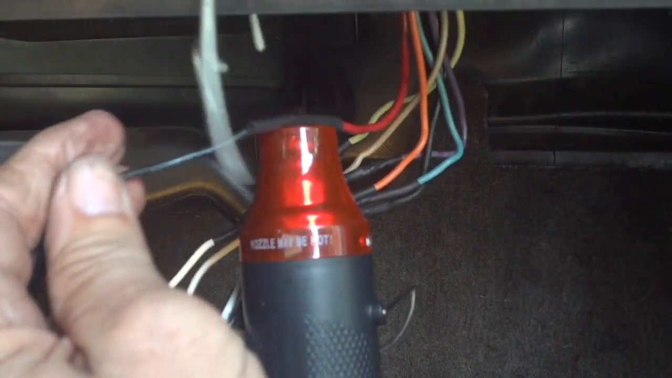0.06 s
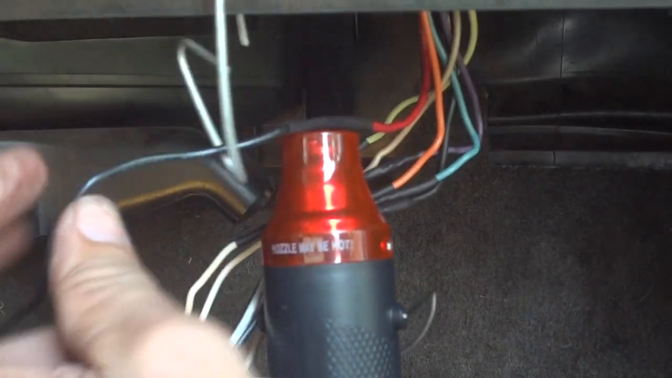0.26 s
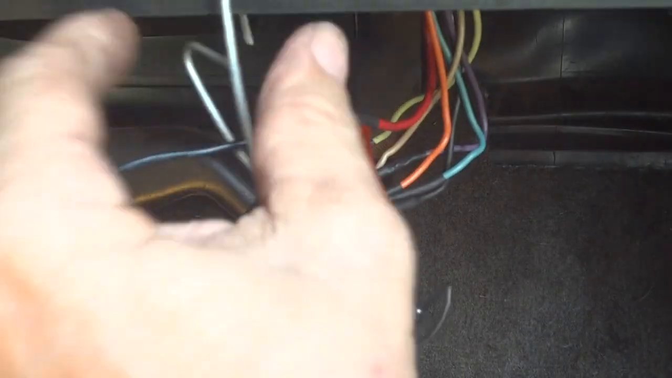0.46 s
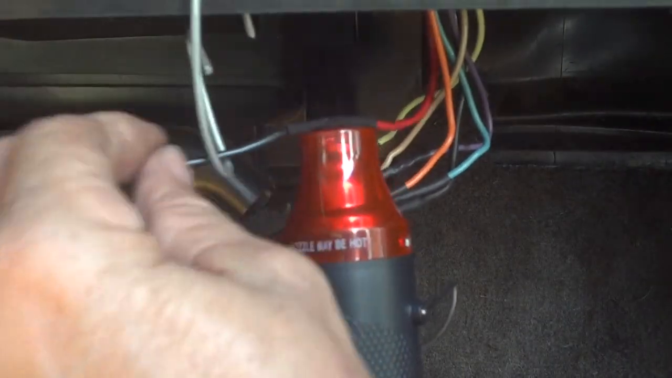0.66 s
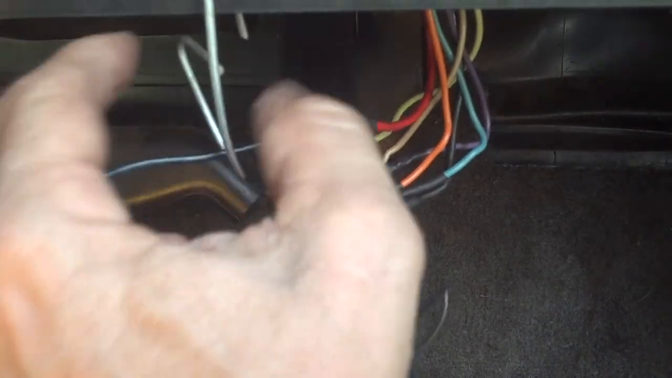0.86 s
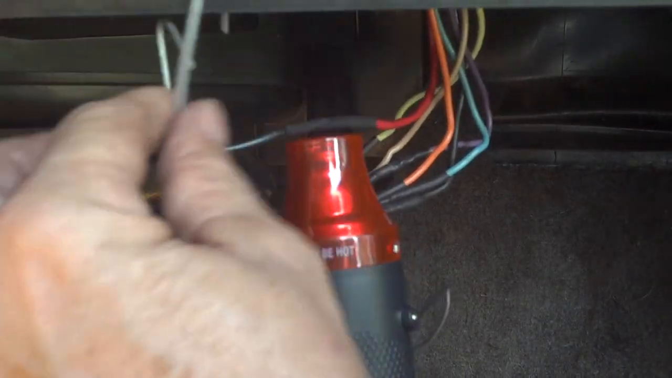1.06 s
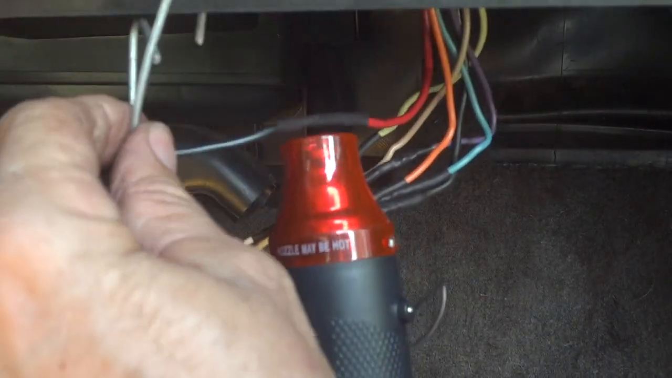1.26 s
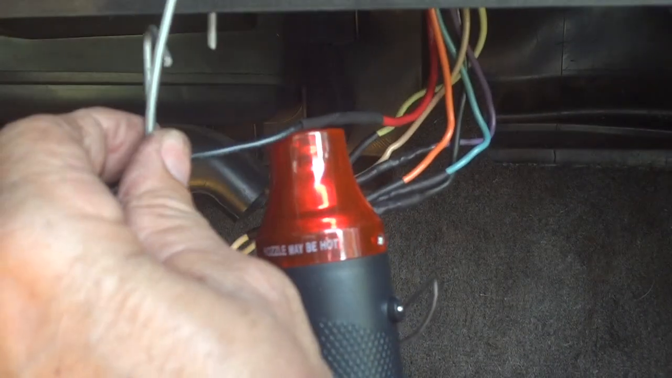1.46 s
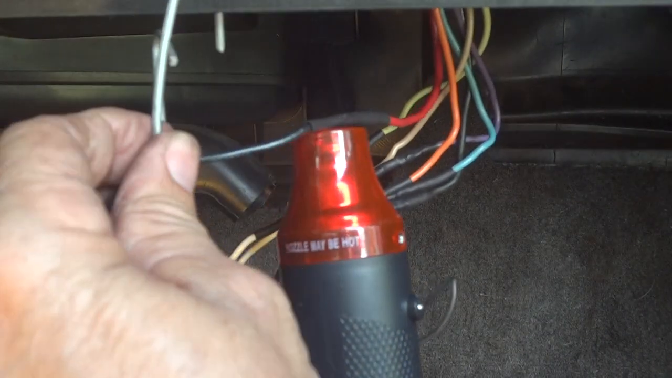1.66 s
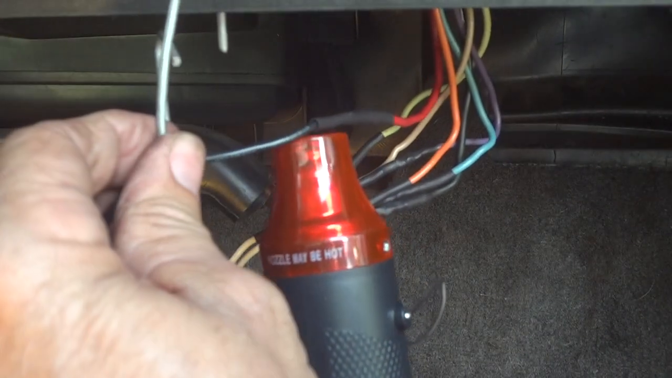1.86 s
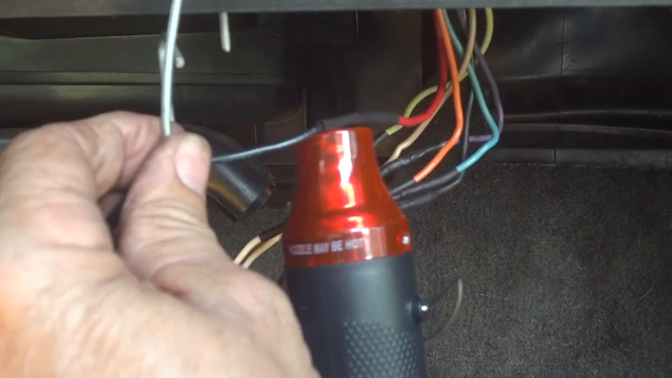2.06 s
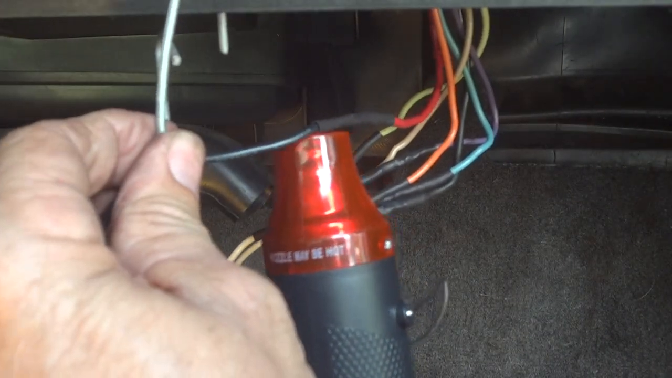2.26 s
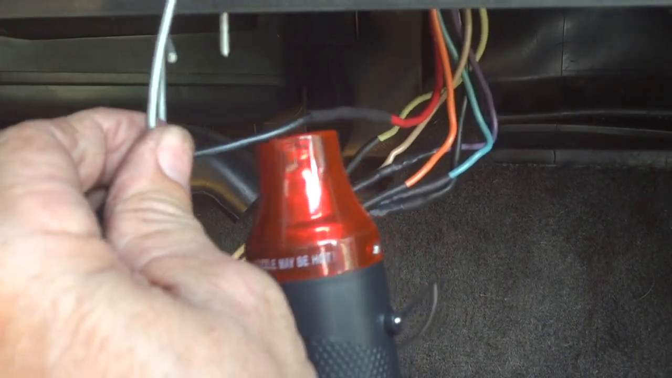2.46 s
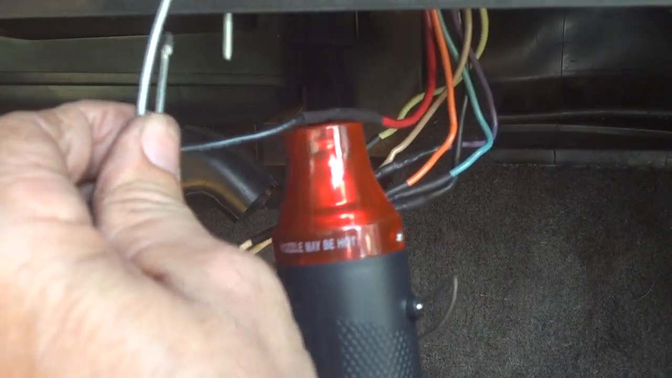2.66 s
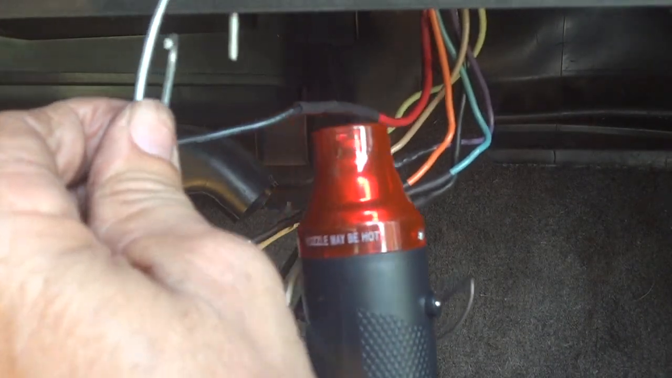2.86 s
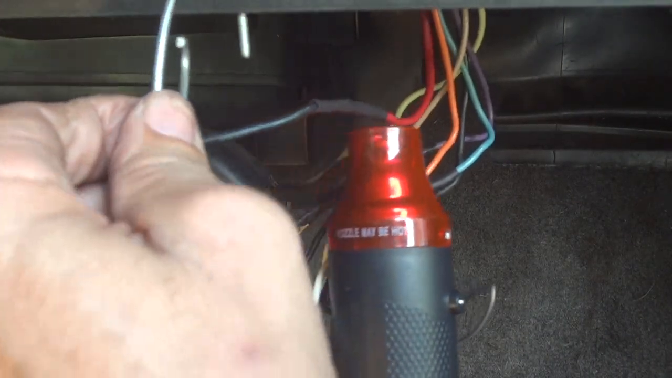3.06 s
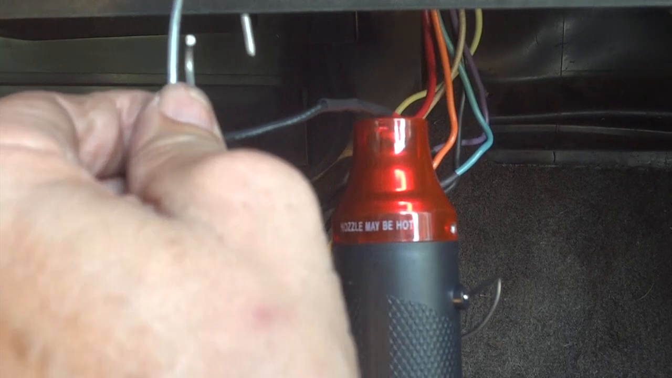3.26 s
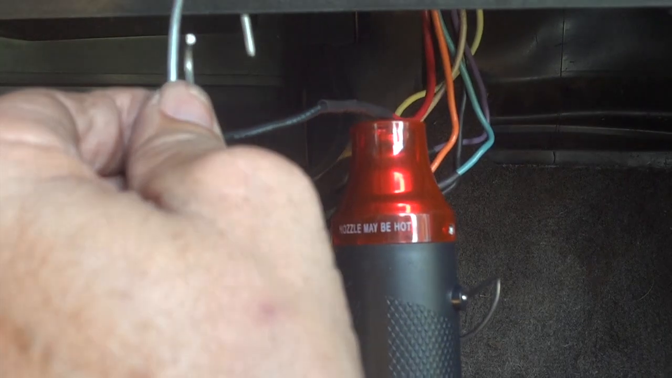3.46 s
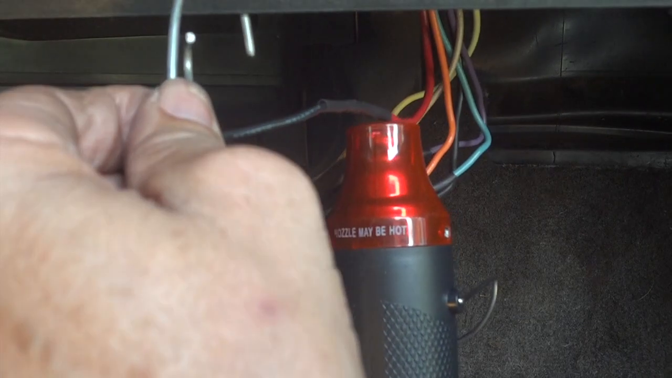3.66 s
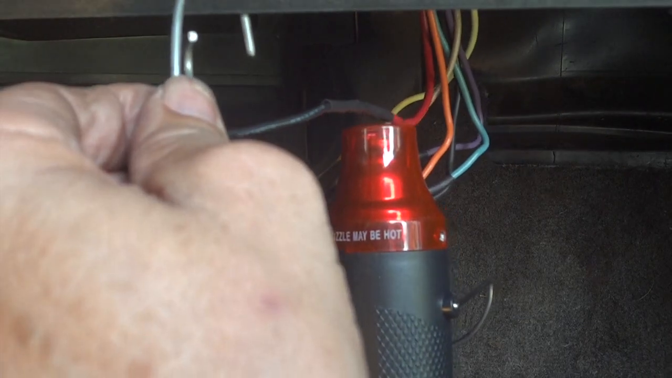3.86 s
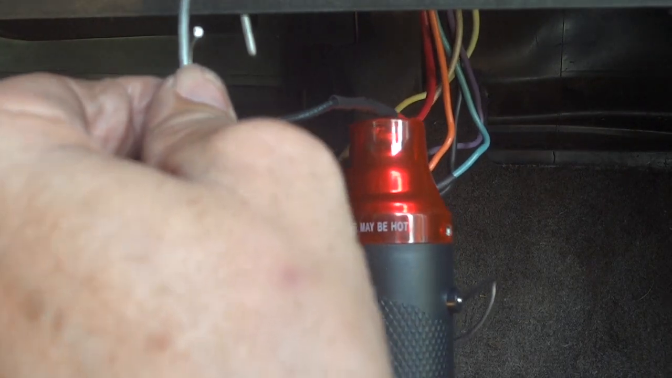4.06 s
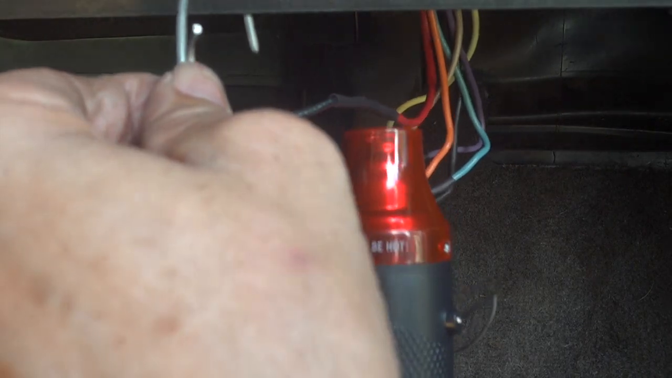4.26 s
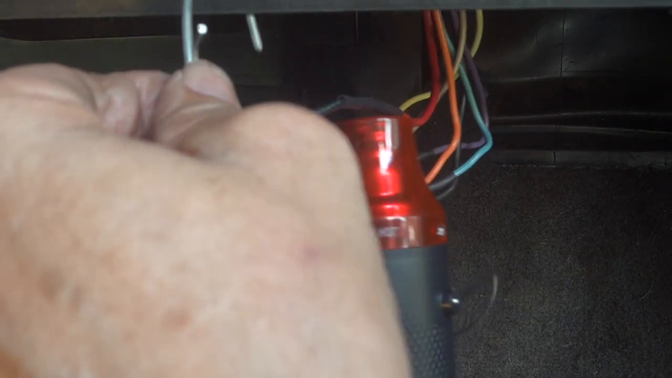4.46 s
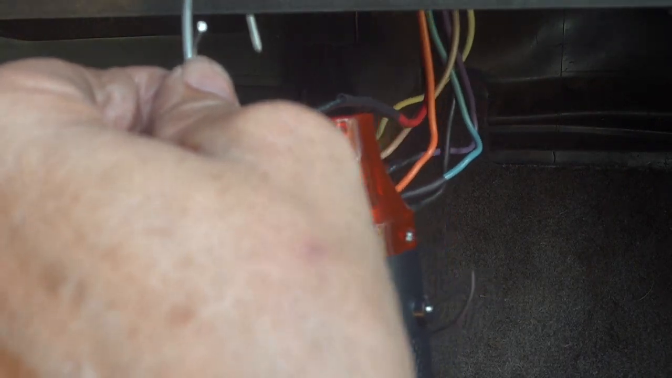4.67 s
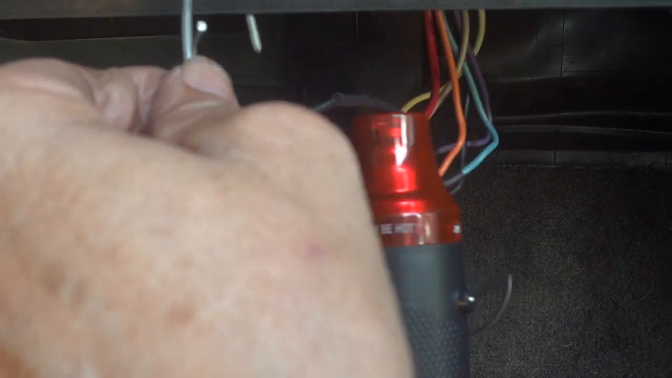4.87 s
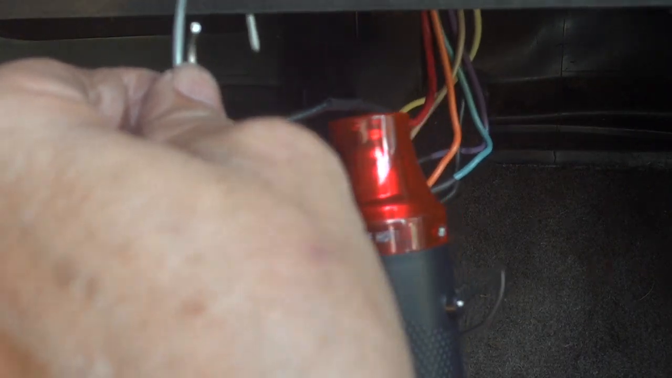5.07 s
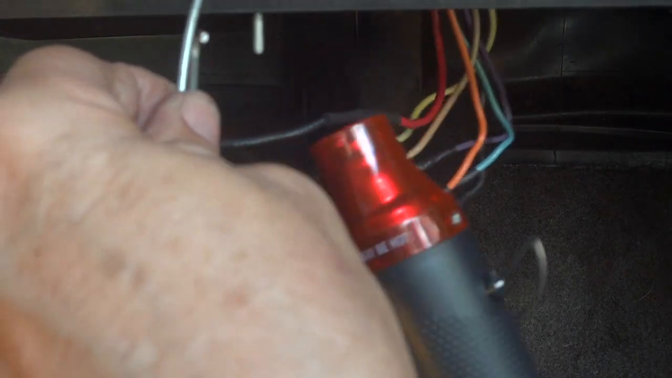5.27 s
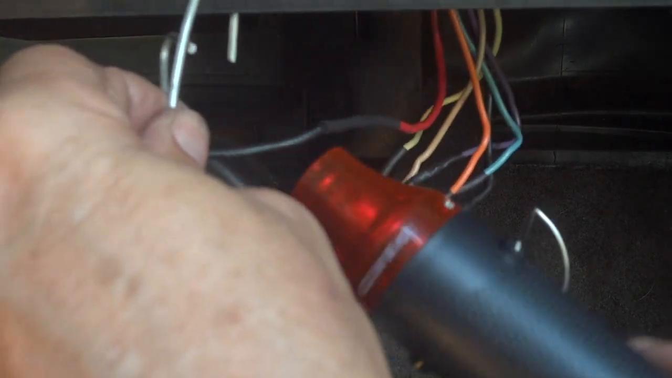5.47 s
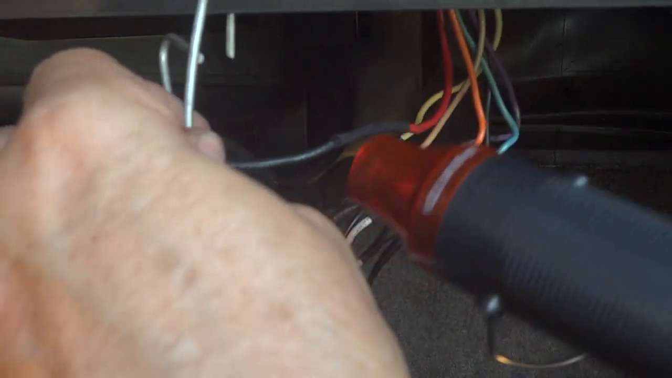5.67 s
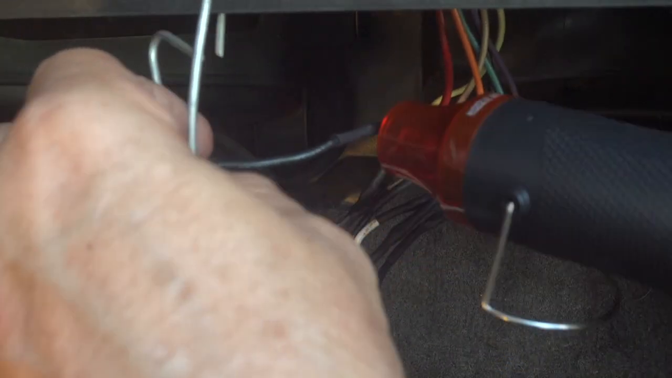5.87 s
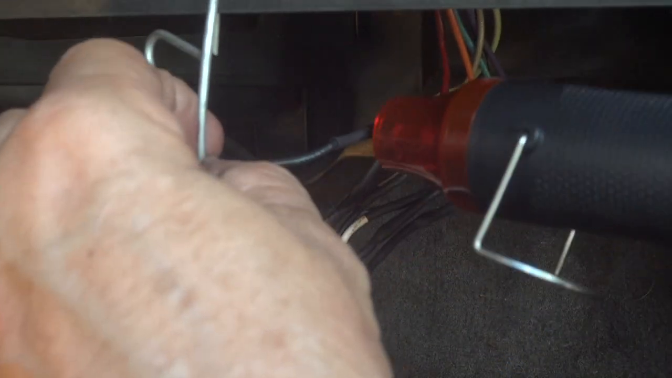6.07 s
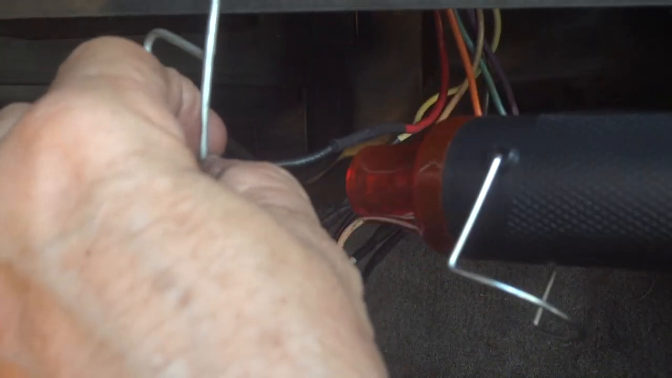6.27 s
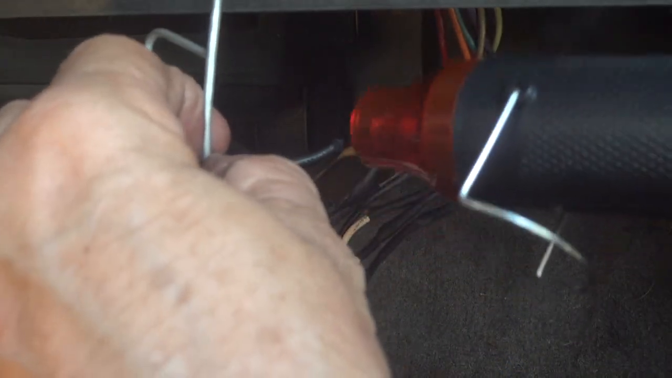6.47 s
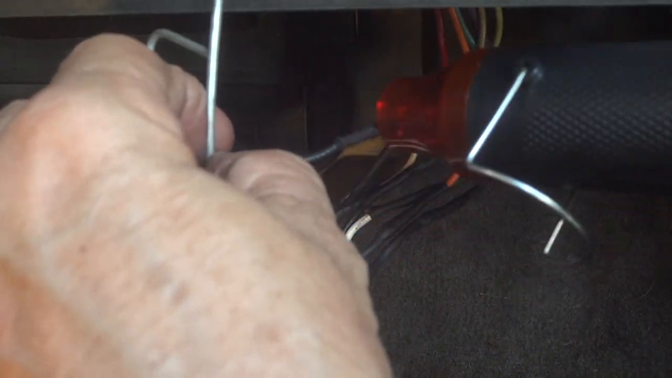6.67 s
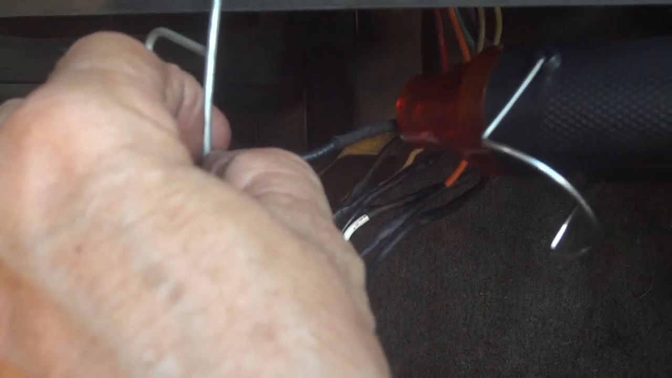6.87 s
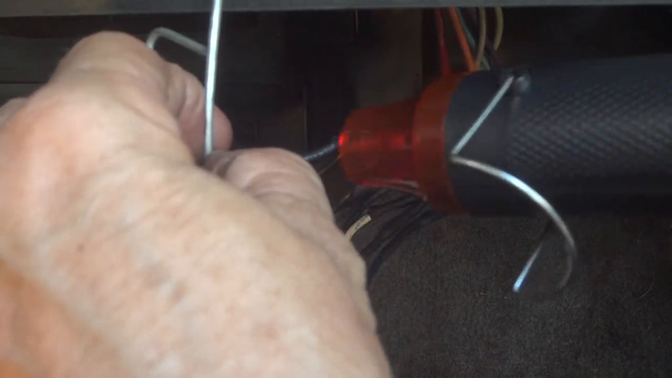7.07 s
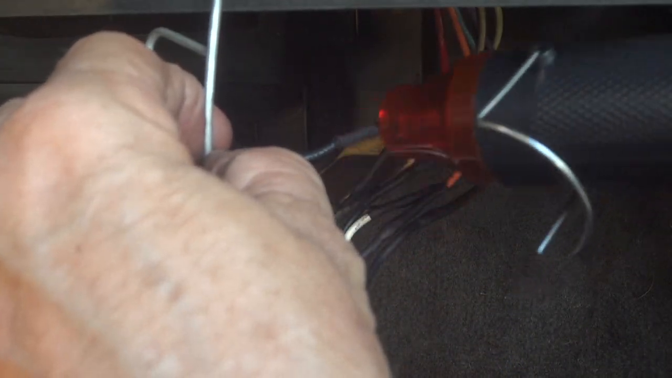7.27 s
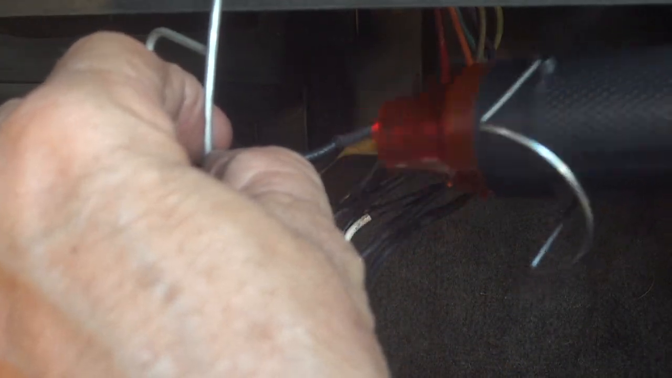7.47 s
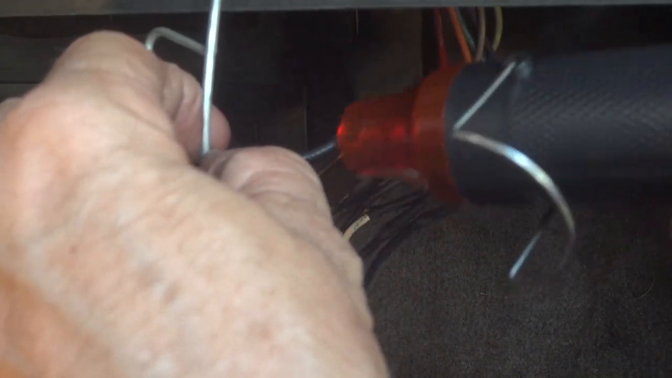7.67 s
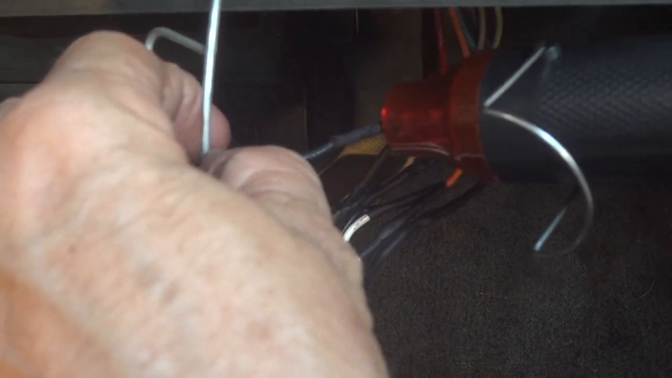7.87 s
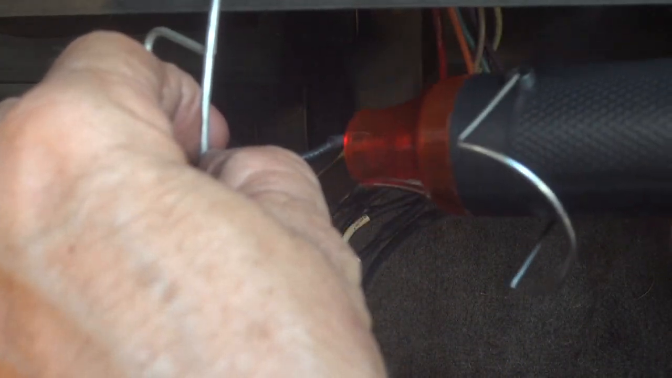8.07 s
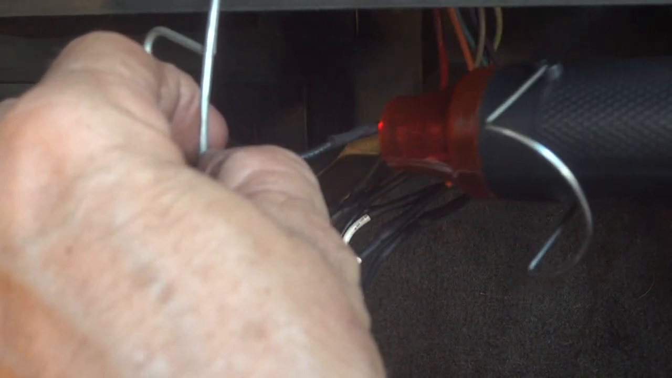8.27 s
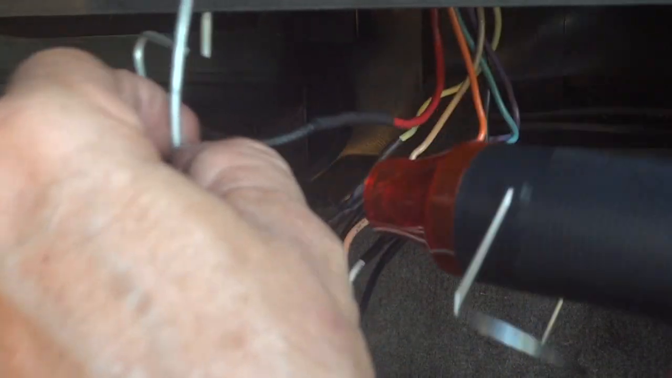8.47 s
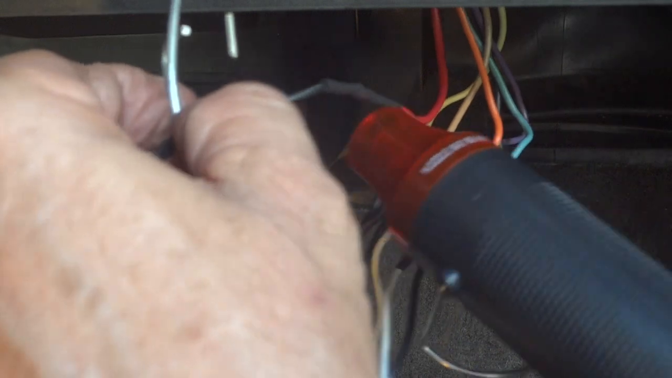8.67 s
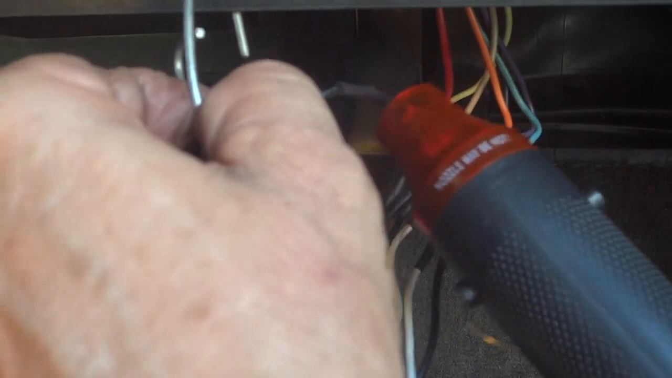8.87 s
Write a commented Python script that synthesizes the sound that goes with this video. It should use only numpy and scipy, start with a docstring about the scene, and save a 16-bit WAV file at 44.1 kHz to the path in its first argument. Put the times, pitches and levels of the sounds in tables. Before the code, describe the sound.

A small electric heat gun blows steadily close by, whining motor and airy rush, then turns sideways with howls, a piercing tone and hollow buffeting roar.

```python
"""An electric heat gun blows on wiring under a vehicle's dashboard, close to the microphone.
From the start its motor spins a five-blade fan: steady whine and rush ringing in the barrel, over a faint drone.
Whine and hum are multiples of the shaft speed; the rush is shaped noise. Past five seconds the gun is turned
on its side: the blade tone leaps, bands of noise howl and puff, and resonant noise roars in the recess.
A second faint hum swells while it lies there, and at the end the gun is turned most of the way back."""
import sys
import numpy as np
from scipy import signal
from scipy.fft import rfft, irfft
from scipy.io import wavfile
from scipy.ndimage import uniform_filter1d

SR = 44100
rng = np.random.default_rng(int(sys.argv[2]) if len(sys.argv) > 2 else 0)


def to_wav(sig):
    """Store sig (one row per channel, or 1-D mono) as 16-bit WAV at the path in sys.argv[1].

    Samples outside -1..1 are clipped; the rate is SR.
    """
    pcm = np.clip(np.atleast_2d(sig), -1, 1) * 32767
    pcm = np.round(pcm).astype(np.int16)
    wavfile.write(sys.argv[1], SR, pcm.T)  # frames by channels


N = 393372
T = np.arange(N) / SR
STFT = dict(fs=SR, nperseg=2048, noverlap=1536)
HZ, FRAME_S, _ = signal.stft(T, **STFT)

# Levels are rms unless called spectra or lifts, and stand before the trims and wavers in the functions.
# In balance_db, plus is left.

# How the gun is held: time_s, tilt (0 upright to 1 sideways)
POSE = [(0, 0.069), (5.18, 0.0058), (5.33, 0.3), (5.45, 0.5), (5.65, 0.26), (6.1, 0.99), (8.45, 0.92),
        (8.65, 0.86), (8.92, 0.25)]
CLEAR_POSE = 0.26  # tilt at which the jet leaves the wires and reaches the recess

# Motor speed: time_s, speed_turns_per_s
SHAFT_SPEED = [(0.01, 405.3), (0.41, 407.3), (0.81, 408.1), (2.81, 408.4), (3.0, 409.2), (3.4, 409.4),
               (3.9, 406.5), (4.3, 409.0), (5.61, 408.6), (6.0, 409.8), (6.3, 409.4), (6.61, 410.3),
               (7.5, 410.6), (7.91, 409.9), (8.4, 410.4), (8.9, 406.3)]
# Blade tone in standing waves, swelling and shifting as the gun moves: time_s, level_db, balance_db
BLADE_TONE = [(0.0, -40.5, 1.5), (0.45, -37, 1.5), (1.79, -40.5, 5), (2.66, -38, 1), (3.45, -45, 8),
              (4.7, -39, 4), (5.07, -40, 5), (5.29, -38, 4.5), (5.47, -27, -10), (5.56, -33.5, -10.5),
              (5.64, -37.5, 5.5), (5.79, -23, -14), (5.86, -24, -16), (6.14, -29.5, -6), (6.58, -37, -17),
              (6.93, -29, -3.5), (7.23, -38, -14), (7.53, -28, -2.0), (7.7, -41.5, -17), (7.94, -30.5, -5),
              (8.16, -37, -12), (8.3, -31.5, -6), (8.52, -34, -8.5), (8.67, -24.5, 4), (8.8, -26, 9),
              (8.92, -39, 8)]
BLADE_COUNT = 5
# Once-a-turn hum, shifting as the gun moves: time_s, level_db
ROTOR_HUM = [(0.0, -45), (0.07, -47), (0.35, -49.5), (0.5, -47), (3.95, -50), (5.37, -46.5), (5.66, -40.5),
             (5.89, -49.5), (6.48, -40), (6.95, -44.5), (7.28, -41), (7.48, -48), (7.77, -43), (7.97, -48),
             (8.17, -43), (8.37, -49), (8.5, -44.5), (8.92, -43.5)]
# Weaker motor tones: multiple_of_shaft_speed, upright_level_db, sideways_level_db
MOTOR_ORDERS = [(2, -56, -40), (3, -57.5, -57), (4, -57.5, -44.5), (6, -63, -52), (9, -66, -57),
                (10, -52.5, -49), (15, -62, -71), (17, -73, -61), (19, -66, -61), (21, -74, -71),
                (25, -75, -68), (26, -71, -78), (29, -76, -74), (30, -81, -80), (35, -75, -79),
                (36, -91, -79)]
# Thin high whistle, shifting as the gun moves: time_s, level_db
WHISTLE_LEVEL = [(0.3, -68), (.57, -48), (.8, -55), (1.3, -49.5), (1.9, -61), (2.25, -55), (2.62, -67),
                 (3.0, -38), (3.17, -50), (3.45, -48), (3.8, -56), (4.1, -45.5), (4.55, -50.5), (5.2, -54),
                 (5.95, -57), (6.3, -50), (7.2, -61), (8.0, -53), (8.5, -62)]
WHISTLE_ORDER = 20  # multiple of the shaft speed
# The whistle pipes up briefly as the gun swings: mid_s, length_s, peak_level_db
WHISTLE_CHIRPS = [(5.656, 0.067, -39), (5.84, 0.073, -49.5), (6.06, .19, -40), (6.83, 0.091, -49),
                  (8.59, .14, -38.5), (8.788, 0.066, -42.5)]

# Strength of the air stream: time_s, level_db (of the 2200-7400 Hz band)
RUSH_LEVEL = [(0.0, -32.5), (1.37, -35), (1.99, -37), (3.1, -35.5), (3.68, -37), (5.09, -34), (5.49, -34.5),
              (5.64, -32), (5.74, -34.5), (5.94, -37), (5.99, -35), (6.38, -29.5), (6.83, -30), (7.55, -32),
              (7.8, -30), (7.82, -31), (8.55, -34), (8.72, -38), (8.92, -34)]
# Rush spectrum, gun upright: frequency_hz, spectrum_db
RUSH_UPRIGHT = [(100, -18), (280, -6), (400, -9.5), (520, 0), (700, -5.5), (950, -0.5), (1120, -4.5),
                (1750, -6.5), (2150, -0.5), (4050, -1), (4250, -10), (8300, -13.5), (9800, -22),
                (16000, -58)]
# Rush spectrum, gun sideways: frequency_hz, spectrum_db
RUSH_SIDEWAYS = [(100, -30), (280, -6), (400, -16.5), (600, 5), (950, 5.5), (1200, -1), (2200, -3),
                 (3000, -5), (4700, -4.5), (6500, -5.5), (7300, -13.5), (8800, -16), (11000, -31.5),
                 (16000, -38)]
# Resonances and dips of barrel and space, gun upright: frequency_hz, width_hz, lift_db
RINGS_UPRIGHT = [(552, 42, -8.5), (585, 40, 3.5), (1140, 56, -8), (1346, 101, 19), (1488, 115, -20),
                 (1550, 35, 3.5), (2096, 140, 3), (2365, 260, -5), (2731, 150, 10.5), (3720, 70, 5),
                 (3794, 70, -8), (4070, 70, 6), (4140, 79, -33), (4630, 120, 4.5), (5380, 410, 6),
                 (6570, 200, 2.5), (7980, 180, 4.5)]
# Resonances and dips of barrel and space, gun sideways: frequency_hz, width_hz, lift_db
RINGS_SIDEWAYS = [(1400, 118, 9), (1575, 86, -9), (1693, 213, 9), (2520, 130, -20), (2680, 310, 11.5),
                  (2980, 120, -15), (3085, 77, 4.5), (3706, 55, 9), (4077, 236, 11.5), (4740, 130, 6.5),
                  (7300, 190, -15)]
# The upper upright resonances slide down as the gun tilts
BEND_ABOVE_HZ, BEND = 2000, 0.43
# Hollow note in the rush: time_s, lift_db
HOOT_LIFT = [(0.3, -3.5), (.45, 2), (.9, -0.5), (1.8, -1.5), (4.7, 0), (5.1, -1.5), (5.4, 0.5), (6.1, 2.5)]
# Balance of the air, gun upright: frequency_hz, balance_db
PAN_UPRIGHT = [(300, 0), (520, -1.5), (670, -5.5), (850, 7.5), (1050, -1.5), (1300, -4.5), (1900, 1.5),
               (2600, 1), (5000, -0.5)]
# Balance of the air, gun sideways: frequency_hz, balance_db
PAN_SIDEWAYS = [(300, 0.5), (650, 1.5), (1100, -5), (1500, -7), (1950, -5.5), (2300, -1.5), (4700, 0),
                (8500, -4), (15000, -1)]
# Phase by which the air reaches the left side first: frequency_hz, lead_rad
LEFT_LEAD = [(250, 0.15), (580, 0.17), (800, -0.1), (1150, 0.14), (1850, 0.64), (2500, 0.21), (4200, 0.05)]
# Part of the air that differs between the sides: frequency_hz, upright_db, sideways_db
DIFFUSE_AIR = [(150, -10.5, -24), (450, -9, -4), (680, -5, -30), (1250, -31, -23), (1650, -7, -13),
               (3000, -20, -12), (5300, -25, -25), (6330, -8.5, -21), (10400, -14, -1), (14500, -39, -14)]
# Fine hiss of the jet on the wires: frequency_hz, upright_spectrum_db, sideways_spectrum_db
FIZZ_SPECTRUM = [(3000, -33, -33), (8000, -7, 4), (10300, 9.5, 2.5), (12550, 8, -4), (12900, 1, -2),
                 (13800, -2, -6), (14900, 0, 0), (16000, -10, -3)]
# Strength of that hiss: time_s, level_db (of the 10200-16000 Hz band)
FIZZ_LEVEL = [(0, -58.5), (1.2, -65), (3.2, -65), (4.3, -68.5), (5.4, -61), (5.95, -67), (6.2, -53.5),
              (6.7, -50), (6.95, -56), (7.5, -65), (8.4, -70), (8.92, -72)]
TILT_PATCHY_DB = 3.5  # added patchiness of the hiss at full tilt

# Low drone: time_s, pitch_hz, level_db
DRONE = [(0, 61.2, -52), (1.4, 61, -51.5), (1.9, 60.6, -62.5), (4.6, 59.8, -60.5), (5.15, 56.1, -55),
         (5.6, 54.7, -57), (5.93, 54.96, -74), (6.37, 55.4, -55), (6.6, 55.1, -73), (6.95, 55.3, -56),
         (7.55, 54, -65), (7.75, 54.7, -59), (8.35, 55.7, -68), (8.55, 56, -61), (8.9, 56.5, -67)]
# Partials of the drone: multiple_of_pitch, relative_db
DRONE_PARTIALS = [(1, -14.5), (2, -1), (3, -11)]
# Bed of rumble: frequency_hz, spectrum_db
RUMBLE_SPECTRUM = [(10, -60), (34, -36), (41, -18), (45, -9), (53, -17), (77, -16), (90, -3), (100, -4),
                   (112, -1), (136, -2.5), (152, -25), (270, -4), (400, -20), (2000, -68)]

# Bands of noise that swell and fade: gliding howls, long soft swells, a thin squeal, treble puffs:
# mid_s, length_s, start_pitch_hz, end_pitch_hz, width_hz, level_db, balance_db
NOISE_BANDS = [(2.578, 0.21, 5200, 5130, 260, -48, 1), (4.75, 1.5, 870, 885, 170, -52, -1),
               (5.05, .9, 2700, 2700, 200, -41.5, 2), (4.9, 0.57, 14250, 14200, 49.5, -58, 0),
               (5.49, .18, 1920, 1720, 210, -42, -10), (5.3, 0.48, 3780, 3420, 200, -42, 3),
               (5.374, 0.18, 7400, 5900, 450, -51, 0), (5.5, 0.3, 5400, 5170, 300, -49, 3),
               (5.55, 0.61, 3520, 3120, 240, -42, -6), (5.556, 0.38, 1980, 1520, 249, -30.5, -10),
               (5.557, 0.09, 1760, 1690, 200, -29, -11), (5.58, 0.065, 3950, 3950, 260, -35, -3),
               (5.583, 0.045, 3100, 3130, 170, -31.5, -5), (5.59, 0.051, 2680, 2670, 170, -30, -5),
               (5.634, 0.042, 1720, 1640, 230, -27, -9), (5.639, 0.12, 5010, 4780, 190, -33, -3.5),
               (6.013, 0.14, 4540, 4350, 210, -33.5, -3), (6.09, .1, 1750, 1780, 250, -37, -10),
               (6.1, .1, 7300, 7350, 170, -42, -13), (6.202, 0.47, 4300, 4820, 350, -37, -3),
               (6.33, 0.093, 2680, 2700, 250, -32, 2), (6.393, 0.065, 5630, 5800, 260, -29.5, -4),
               (6.58, 0.22, 3700, 3700, 170, -35.5, -2), (6.566, 0.47, 5700, 6240, 480, -37, -5),
               (6.695, .2, 2720, 2730, 300, -40, -2), (6.803, 0.28, 4760, 4600, 330, -32, -2),
               (6.94, 0.38, 4620, 4850, 330, -32.5, -.5), (7.23, 0.28, 2660, 2720, 260, -36.5, 1),
               (7.65, .12, 14800, 14800, 450, -54, -1), (7.8, .1, 11900, 11900, 900, -51, -5),
               (7.81, .1, 14900, 14900, 550, -52, -3), (8.19, .2, 14900, 14900, 450, -53, -1),
               (8.51, 0.078, 11500, 12400, 1100, -50, -6), (8.57, 0.066, 5240, 5120, 150, -35, 0),
               (8.61, 0.13, 7560, 7950, 400, -41, 0), (8.638, 0.34, 4260, 3450, 600, -41, 0),
               (8.82, 0.55, 4830, 5270, 330, -44.5, -2), (8.86, 0.31, 1360, 1560, 300, -41.5, -4),
               (8.879, 0.39, 2090, 3120, 400, -34, 2.5), (8.892, 0.083, 2940, 3120, 260, -31, 2.5)]
# Jet striking the recess: time_s, level_db (of the 480-785 Hz band)
ROAR_LEVEL = [(5.4, -58), (5.5, -49), (5.66, -32), (5.76, -43), (5.98, -42), (6.06, -34), (6.3, -29),
              (7.1, -28.5), (7.24, -28), (7.36, -32.5), (7.45, -34), (8.3, -33.5), (8.85, -40)]
# Hard gusts in the recess, and a lull where negative: mid_s, length_s, lift_db
BUFFETS = [(6.115, 0.045, 8), (6.15, 0.036, 0), (6.235, 0.079, 6), (6.37, 0.035, 6), (6.55, 0.085, 3.5),
           (6.748, 0.044, 10.5), (6.835, 0.089, 5), (7.065, 0.081, 4), (7.115, 0.05, 7), (7.255, .04, -10),
           (7.31, 0.1, 5), (7.375, 0.049, 10)]
# Sound of the recess: frequency_hz, spectrum_db
RECESS_SPECTRUM = [(60, -39), (400, -37), (490, -17), (580, 1.5), (650, 3), (760, -1), (900, -5.5),
                   (1150, -57), (3000, -47)]

EDGE_HZ = 15800  # upper band limit at the microphone


def amp(db):
    """Amplitude of a level in dB."""
    return 10 ** (np.asarray(db) / 20)


def evened(x):
    """A signal scaled to rms one."""
    return x / np.sqrt(np.mean(x ** 2) + 1e-20)


def follow(rows, at):
    """The columns of a table, joined by straight lines and read at the given places."""
    place, *columns = np.transpose(rows)
    return [np.interp(at, place, c) for c in columns]


def bell(centre_hz, width_hz):
    """Gain of a steep resonance, one at its centre."""
    return 1 / (1 + 2 * ((HZ[:, None] - centre_hz) / width_hz) ** 2)


def read(points, rings=()):
    """A table over log frequency as a column, lifted or dipped in dB at its resonances."""
    f, values = np.transpose(points)
    lift = 0
    for hz, width, peak_db in rings:
        lift = lift + 10 * np.log10(1 + (amp(peak_db) ** 2 - 1) * bell(hz, width) ** 2)
    return np.interp(np.log(HZ + 1), np.log(f), values)[:, None] + lift


def bent(colour, pose):
    """A spectrum whose upper part sinks in pitch as the gun tilts."""
    hz = HZ[:, None]
    reach_hz = np.maximum(hz - BEND_ABOVE_HZ, 0) * bell(BEND_ABOVE_HZ, 4000)
    return np.interp(hz + BEND * pose * reach_hz, HZ, colour[:, 0])


def sides(pan_db):
    """Left and right gains whose mean is one."""
    pair = np.array([amp(pan_db / 2), amp(-pan_db / 2)])
    return pair / pair.mean(0)


def drift(rate_hz):
    """Random wander of unit size, up to about the given rate."""
    f = np.fft.rfftfreq(N, 1 / SR)
    return evened(irfft(rfft(rng.standard_normal(N)) / (1 + (f / rate_hz) ** 4), N))


def frame_drift(rate_hz):
    """The same kind of wander, one value per frame."""
    return np.interp(FRAME_S, T, drift(rate_hz))


def lifts(rows, at):
    """Short smooth rises or dips, one for each row of mid_s, length_s, height."""
    return sum(height * np.cos(np.pi * np.clip((at - s) / length, -.5, .5)) for s, length, height in rows)


def patches(width_order, length_order):
    """A random field of unit size, smooth over so many frequency bins and frames."""
    field = rng.standard_normal((len(HZ), len(FRAME_S)))
    for _ in range(2):
        field = uniform_filter1d(field, size=width_order, axis=0)
        field = uniform_filter1d(field, size=length_order, axis=1)
    return evened(field)


def unit_band(gain, lo_hz, hi_hz):
    """Scales a spectrum so that its noise has rms one inside a band."""
    inside = np.clip(np.minimum(HZ - lo_hz, hi_hz - HZ) / HZ[1] + .5, 0, 1)[:, None]
    return gain / np.sqrt(np.mean(gain ** 2 * inside, axis=0) + 1e-20)


def noise(gain, apart, steady=0):
    """Noise shaped by a (side, frequency, time) gain, part differing by side; steady evens its surges."""
    common, other = signal.stft(rng.standard_normal((2, N)), **STFT)[2]
    surge = uniform_filter1d(abs(common) ** 2, size=11, axis=0)
    surge = uniform_filter1d(surge, size=7, axis=1)
    common = common / (surge / surge.mean() + 1e-9) ** (steady / 2)
    pair = np.array([common + apart * other, common - apart * other])
    return signal.istft(pair * gain, **STFT)[1][:, :N]


def turned(at):
    """How far the jet has swung off the wires into the recess, 0 to 1."""
    return np.clip(follow(POSE, at)[0] / CLEAR_POSE, 0, 1)


def shaft(wobble=0.00029):
    """Angle of the motor shaft in radians, turning slightly unsteadily."""
    speed, = follow(SHAFT_SPEED, T)
    return 2 * np.pi * np.cumsum(speed * (1 + wobble * drift(27))) / SR


def motor(angle, swell_db=1.3, swell_per_order_db=0.1633, swing_db=-3, rough=0.6):
    """Every tone is a multiple of the shaft speed; the weaker orders swell more the higher they are."""
    pose, = follow(POSE, T)
    buzz = whistle(angle)
    swell, shake = np.minimum(drift(5.1), 1.6), drift(25)
    for multiple, upright_db, sideways_db in MOTOR_ORDERS:
        # each order swells and shakes in its own time
        swell_shift, shake_shift, phase = rng.integers(0, N, 3)
        fading_db = (swell_db + swell_per_order_db * multiple) * np.roll(swell, swell_shift)
        level_db = upright_db + pose ** 2 * (sideways_db - upright_db)
        strength = amp(level_db + swing_db * np.sin(np.pi * pose) + fading_db)
        buzz += strength * np.cos(round(multiple) * angle + phase + rough * np.roll(shake, shake_shift))
    # root two turns the peak of a cosine into its rms
    return np.sqrt(2) * (blades(angle) + rotor(angle) + buzz * sides(-6 * pose))


def blades(angle, trim_db=2.5, flutter_db=0.46, lead_rad=0.36):
    """Five blades pass per turn; their tone reaches the left side first."""
    pose, = follow(POSE, T)
    db, pan_db = follow(BLADE_TONE, T)
    blade_angle = BLADE_COUNT * angle
    tone = np.cos([blade_angle + lead_rad + 0.42 * pose, blade_angle])
    return amp(db + trim_db + flutter_db * drift(23)) * sides(pan_db) * tone


def rotor(angle, trim_db=1, waver_db=.5):
    """The unbalanced rotor hums once a turn; its balance shifts right as the gun tilts."""
    pose, = follow(POSE, T)
    db = follow(ROTOR_HUM, T)[0] + trim_db + waver_db * drift(6.8)
    return amp(db) * np.cos([angle - .4 + 0.6 * pose, angle]) * sides(1.8 - 3.8 * pose)


def air(angle, trim_db=-1.0, hoot_steady=0.18, swing_db=-8, hollow_db=-3, edge_db=-4,
        patchy_db=0.27, patchy_treble_db=1.85, gust_db=0.44, sputter_db=0.77, chop=0.06):
    """Turbulence coloured by the barrel; its resonances change as the gun is turned."""
    pose, = follow(POSE, FRAME_S)
    rush_db, = follow(RUSH_LEVEL, FRAME_S)
    half_tilt = np.sin(np.pi * pose)
    upright = bent(read(RUSH_UPRIGHT, RINGS_UPRIGHT), pose)
    colour = (1 - pose) * upright + pose * read(RUSH_SIDEWAYS, RINGS_SIDEWAYS)
    # the hollow note of the rush is partly steadied, and sinks in mid-swing
    hoot = bell(1270, 300)
    colour = colour + (follow(HOOT_LIFT, FRAME_S)[0] + swing_db * half_tilt) * hoot
    # in mid-swing the nozzle points away, and the rush hollows out
    hollow = hollow_db * half_tilt ** 2 * bell(3200, 2000)
    hollow = hollow + edge_db * half_tilt * bell(4200, 450)
    # the rush's colour varies at random, the treble most
    shifts = (patchy_db + patchy_treble_db * bell(11600, 4600)) * patches(width_order=9, length_order=22)
    level = amp(rush_db + trim_db + hollow + shadow() + shifts)
    body = unit_band(amp(colour), 2200, 7400) * level

    pan = sides((1 - pose) * read(PAN_UPRIGHT) + pose * read(PAN_SIDEWAYS))
    lead = read(LEFT_LEAD)
    delay = np.exp(.5j * np.array([lead, -lead]))
    upright_db, sideways_db = follow(DIFFUSE_AIR, HZ[:, None])
    diffuse = amp((1 - pose) * upright_db + pose * sideways_db)
    stream = noise(np.hypot(body, fizz(pose)) * pan * delay, diffuse, hoot_steady * hoot)
    # the fan chops the stream once a turn, and the jet sputters more as the gun tilts
    unrest_db = (gust_db + sputter_db * follow(POSE, T)[0] ** 2) * drift(37)
    return stream * (1 + chop * np.cos(angle)) * amp(unrest_db)


def fizz(pose, patchy_db=2.2, flicker_db=3.1):
    """Spectrum of the fine hiss, randomly patchy in frequency and time, more so as the gun tilts."""
    upright, sideways = follow(FIZZ_SPECTRUM, HZ[:, None])
    patchiness = (patchy_db + TILT_PATCHY_DB * pose) * patches(width_order=18, length_order=7)
    level_db = follow(FIZZ_LEVEL, FRAME_S)[0] + flicker_db * frame_drift(14)
    colour = amp((1 - pose) * upright + pose * sideways + patchiness)
    return unit_band(colour, 10200, 16000) * amp(level_db)


def drone(trim_db=-1, rumble_db=-61, rumble_turned_db=-5):
    """A faint low hum of three partials that sags in pitch, over a bed of low rumbling noise."""
    hz, db = follow(DRONE, T)
    angle = 2 * np.pi * np.cumsum(hz) / SR
    hum = evened(sum(amp(level) * np.cos(round(k) * angle) for k, level in DRONE_PARTIALS))
    f, bed_db = np.transpose(RUMBLE_SPECTRUM)
    bed_gain = amp(np.interp(np.fft.rfftfreq(N, 1 / SR), f, bed_db))
    bed = evened(irfft(rfft(rng.standard_normal(N)) * bed_gain, N))
    rumble = amp(rumble_db + rumble_turned_db * turned(T)) * bed
    return (hum * amp(db + trim_db) + rumble) * sides(0.87)[:, None]


def whistle(angle, waver_db=0.7, rough=0.21):
    """A thin whistle at twenty times the speed holds on, and chirps when the gun swings."""
    strength = amp(follow(WHISTLE_LEVEL, T)[0] + waver_db * drift(5))
    strength = strength + lifts([(s, length, amp(db)) for s, length, db in WHISTLE_CHIRPS], T)
    roughness = 1 + rough * (drift(40) + 1j * drift(40))
    return (strength * np.exp(1j * WHISTLE_ORDER * angle) * roughness).real


def shadow(mid_s=2.0, length_s=1.6, dip_db=-7, hz=700, width_hz=75):
    """A hollow in the low rush deepens while the hand steadies the wire beside the nozzle."""
    return lifts([(mid_s, length_s, dip_db)], FRAME_S) * bell(hz, width_hz)


def noise_bands(crest_db=-11, crest_hz=2040, crest_width_hz=190, ragged_db=0.85, steady=0.62):
    """Bands of noise that swell and fade: gliding howls, long soft swells, a thin squeal, treble puffs."""
    # the standing wave that lifts the blade tone also lifts the air around its pitch
    blade_db, blade_pan_db = follow(BLADE_TONE, FRAME_S)
    crest = unit_band(bell(crest_hz, crest_width_hz), 0, SR / 2)
    crest = crest * amp(blade_db + crest_db) * turned(FRAME_S)
    power = (crest * sides(blade_pan_db)[:, None]) ** 2
    for mid_s, length_s, start_hz, end_hz, width_hz, db, pan_db in NOISE_BANDS:
        u = np.clip((FRAME_S - mid_s) / length_s, -.5, .5)
        peak = bell(start_hz + (end_hz - start_hz) * (u + .5), width_hz)
        gain = unit_band(peak, 0, SR / 2) * amp(db) * np.cos(np.pi * u)
        power = power + (gain * sides(pan_db)[:, None, None]) ** 2
    return noise(np.sqrt(power), apart=0.044, steady=steady) * amp(ragged_db * drift(45))


def roar(trim_db=-0.73, pan_db=-4.0, buffet_db=0.9, upper_per_gust=0.19, upper_wander_db=1.0):
    """The sideways jet buffets the hollow behind the dashboard; gusts stir its upper resonance most."""
    level_db = follow(ROAR_LEVEL, T)[0] + lifts(BUFFETS, T)
    stir_db = upper_per_gust * lifts(BUFFETS, FRAME_S) + upper_wander_db * frame_drift(6.8)
    upper = stir_db * bell(830, 150)
    hollow = noise(unit_band(amp(read(RECESS_SPECTRUM) + upper), 480, 785), apart=0.055)
    strength = amp(level_db + trim_db + buffet_db * drift(21.0))
    return hollow * turned(T) * strength * sides(pan_db)[:, None]


def moan(mid_s=7.47, length_s=2.2, hz=139, level_db=-60, waver_db=-1.0):
    """A second faint low hum, a plain sine, swells and fades while the gun lies on its side."""
    swell = lifts([(mid_s, length_s, 1)], T)
    return np.sqrt(2) * swell * amp(level_db + waver_db * drift(4.3)) * np.cos(2 * np.pi * hz * T)


def scene():
    """Motor, air, drone, noise bands, roar and moan together, left and right."""
    angle = shaft()
    return motor(angle) + air(angle) + drone() + noise_bands() + roar() + moan()


def record(dry, low_cut_hz=40):
    """The microphone's low cut and upper band limit."""
    low_cut = signal.butter(4, low_cut_hz, "highpass", fs=SR, output="sos")
    thin = signal.sosfilt(low_cut, dry)
    band_limit = signal.firwin(511, EDGE_HZ, window=("kaiser", 9), fs=SR)
    return signal.oaconvolve(thin, band_limit[None], "same")


dry = scene()
out = record(dry)
to_wav(out)
```